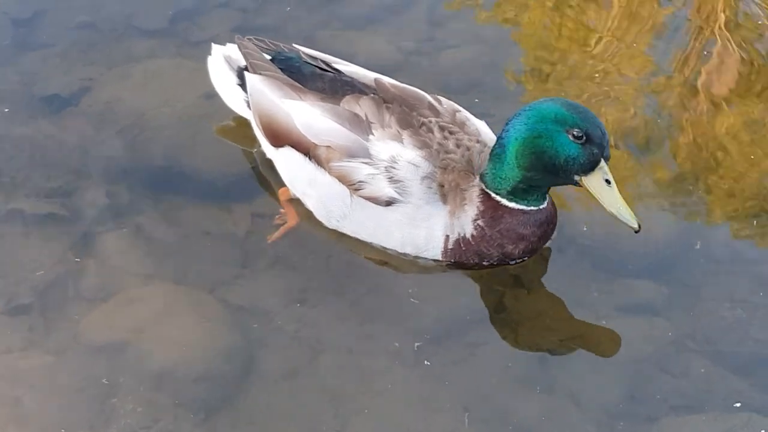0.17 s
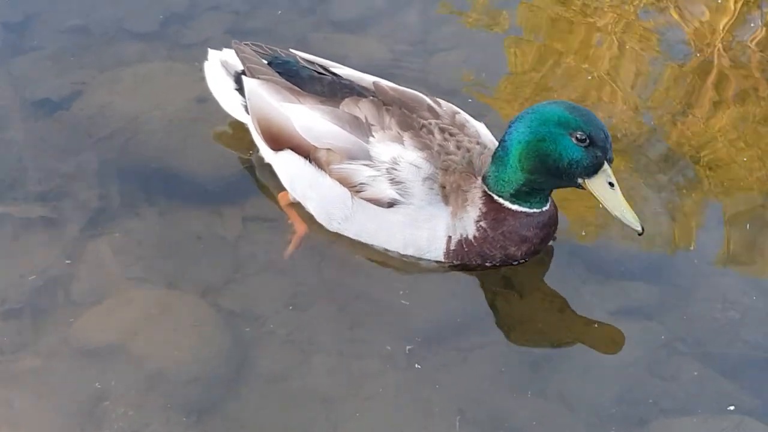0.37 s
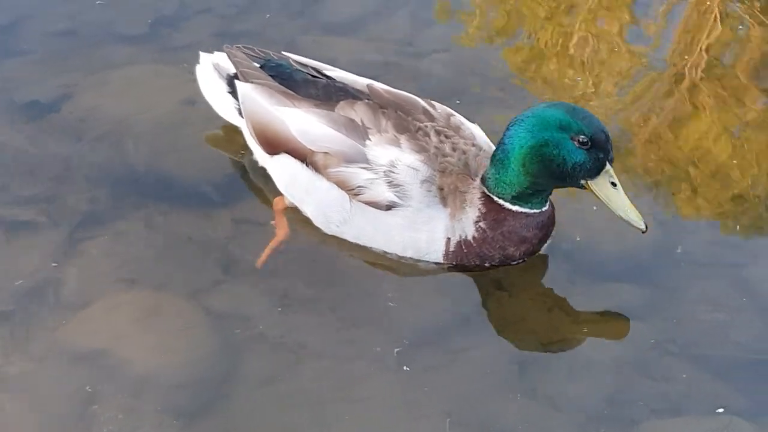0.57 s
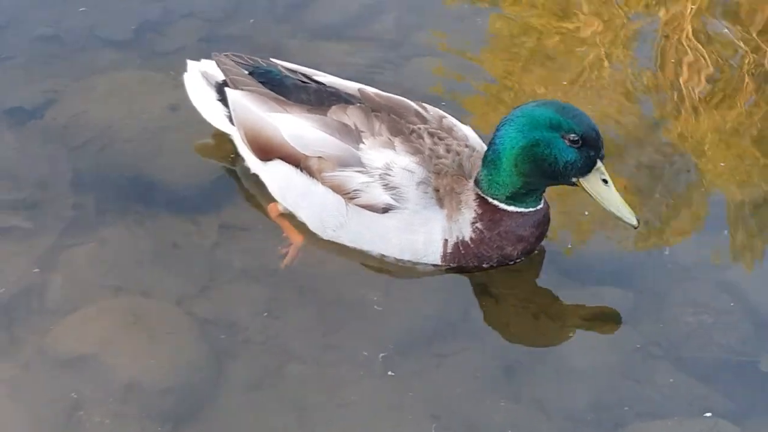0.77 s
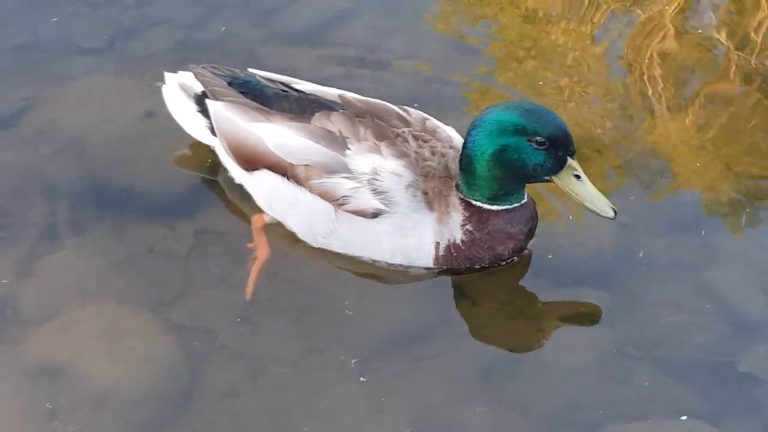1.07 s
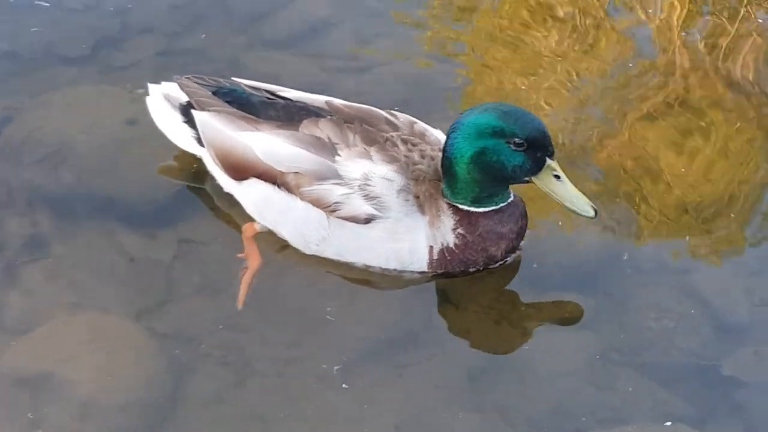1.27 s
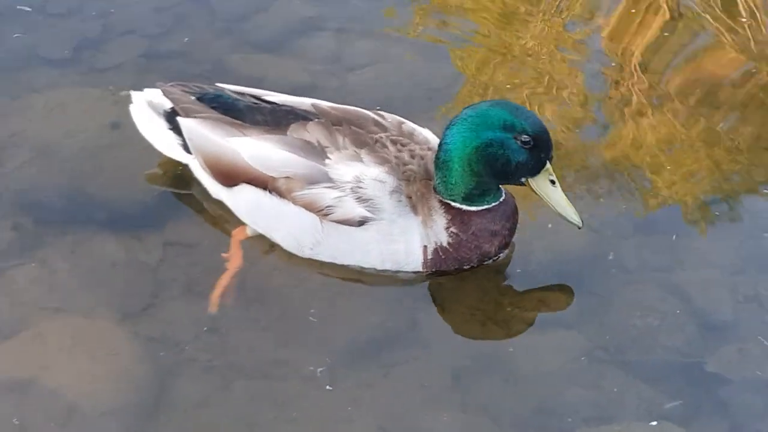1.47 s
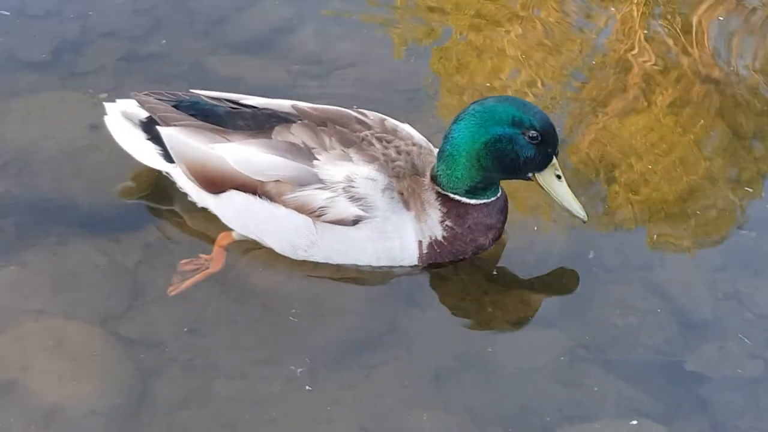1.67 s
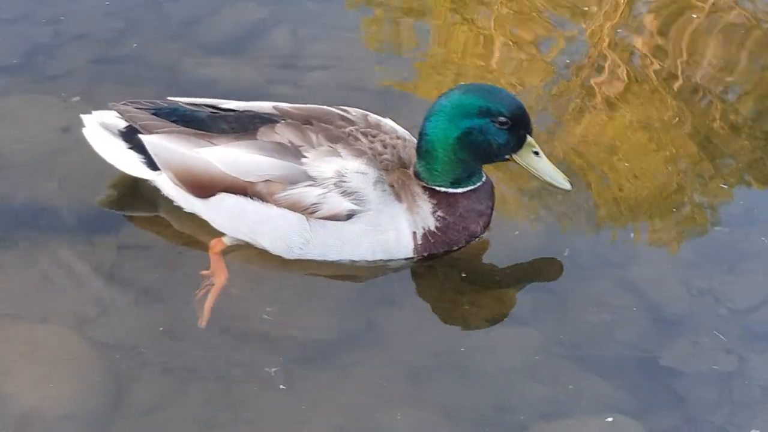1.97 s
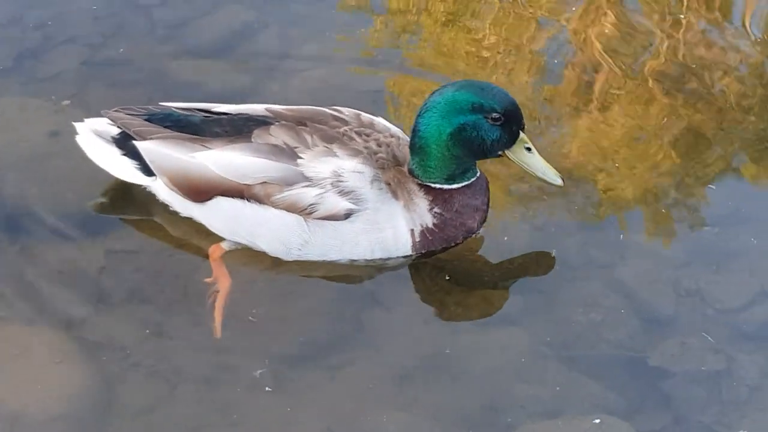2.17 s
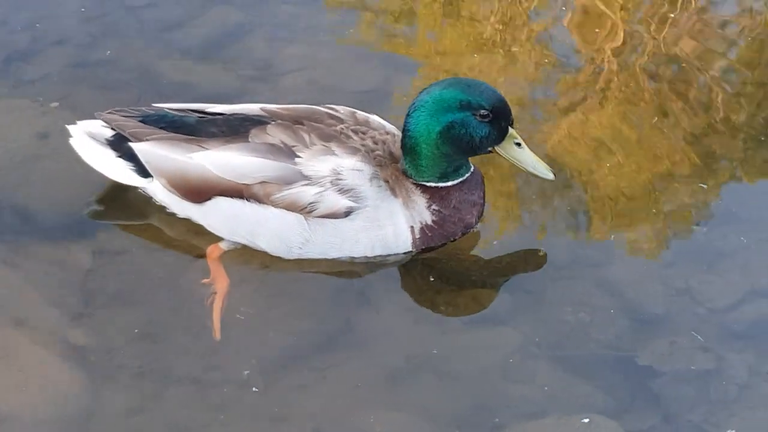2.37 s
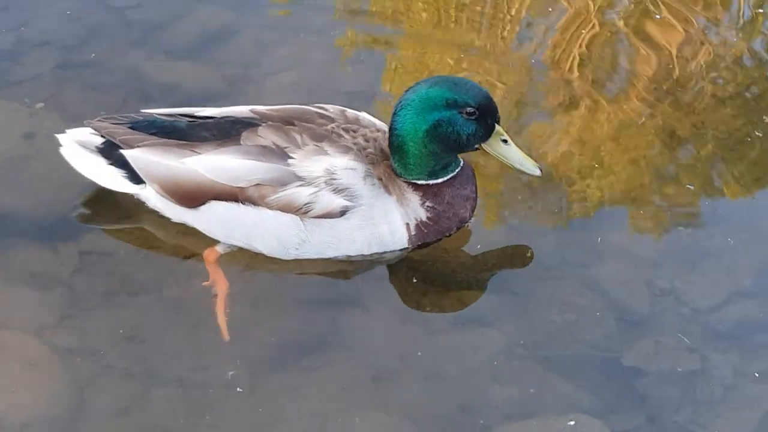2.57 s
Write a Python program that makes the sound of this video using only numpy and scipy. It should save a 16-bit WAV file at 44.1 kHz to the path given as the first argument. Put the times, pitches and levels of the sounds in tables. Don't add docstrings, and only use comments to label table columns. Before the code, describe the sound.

Close stereo outdoor pickup of a drake muttering brief grating quacks, each a rattle of a few quick pulses, with tiny bill ticks, short pond echo, left-side wind thumps, light reed hiss and faint distant traffic.

```python
import sys
import numpy as np
from scipy import signal
from scipy.fft import rfft, irfft, next_fast_len
from scipy.io import wavfile
from scipy.ndimage import uniform_filter1d, map_coordinates

SR = 44100
rng = np.random.default_rng(int(sys.argv[2]) if len(sys.argv) > 2 else 0)


def amplitude_ratio(level_db):
    exponent = np.asarray(level_db, float) / 20
    return 10 ** exponent


def pcm_store(signal):
    levels = np.round(np.clip(np.atleast_2d(signal), -1, 1) * 32767)
    wavfile.write(sys.argv[1], SR, levels.astype(np.int16).T)


N = 119952

# (frequency [Hz], density [dB per Hz])
WASH_SPECTRUM = [(240, -79), (400, -3), (569, -5.5), (914, -13), (1960, -4.5), (2320, -18), (4560, -38),
                 (7670, -33), (15500, -60)]
# (frequency [Hz], level [dB])
TRAFFIC_SPECTRUM = [(60, -17), (130, 3), (300, -5.5), (700, -20.5), (1200, -52)]
# (time [s], level [dB])
BUFFET_LEVEL = [(0.0, -52), (0.25, -59.5), (0.78, -51), (0.89, -52.5), (1.12, -49), (1.3, -48.5),
                (1.85, -53.5), (2.44, -52.5), (2.61, -46), (2.72, -51)]
# (frequency [Hz], density [dB per Hz])
RUMBLE_SPECTRUM = [(12, -32), (20, -5), (108, 1.5), (171, -8.5), (253, -13), (368, -29), (564, -36.5),
                   (664, -50), (1000, -43), (1300, -86), (2200, -120)]
# (frequency [Hz], gain [dB])
RIGHT_PORT_GAIN = [(30, -2.5), (100, -7.5), (200, -1.5), (700, 8)]
# (time [s], peak [dB], swing [Hz], snap [dB])
THUMPS = [(0.504, -42, 118, -16), (0.736, -42, 80, -35), (0.748, -40, 79.6, -31), (0.761, -43.5, 82, -40),
          (1.136, -43, 91, -40), (1.208, -36, 85, -42), (1.2415, -25.5, 106.5, -18), (1.442, -32, 98, -22),
          (1.459, -35, 75.5, -48), (1.486, -35.5, 98, -33), (1.626, -27.5, 84.4, -28),
          (1.721, -39.5, 85, -32), (1.997, -34.5, 157, -44), (2.016, -37.5, 79, -40),
          (2.12, -24, 95.3, -30), (2.187, -42, 78, -19), (2.234, -42, 75.6, -27), (2.367, -30, 99.7, -33),
          (2.443, -42, 65.5, -38), (2.457, -37, 61.9, -43), (2.512, -42, 129, -8), (2.521, -35, 90, -35),
          (2.543, -47.5, 75.4, -5.5), (2.617, -37, 129, -18), (2.568, -44, 110, -19),
          (2.643, -41.5, 108, -18), (2.673, -40, 81, -33), (2.685, -40, 75, -30), (2.701, -39.5, 80, -20)]
SUCTION_THUMPS = [5, 6, 13]
# (frequency [Hz], width [Hz], level [dB])
SNAP_PEAKS = [(300, 380, 0), (900, 900, -27)]
# (time [s], level [dB])
GUST_LEVEL = [(0, -84), (.4, -76), (.74, -78.5), (.84, -63.5), (.96, -67.5), (1.02, -72), (1.25, -69.5),
              (1.5, -66.5), (1.63, -66), (1.72, -73.5), (1.95, -76.5), (2.05, -76.5), (2.22, -77.5),
              (2.3, -62), (2.4, -62.5), (2.5, -66.5), (2.62, -70.5), (2.72, -67)]
# (frequency [Hz], density [dB per Hz])
REED_SPECTRUM = [(530, -18), (900, -14), (1240, -13.5), (1580, -5.5), (2790, -6.5), (3580, -7),
                 (5840, -6.5), (7500, -4), (15500, -24.5)]
# (frequency [Hz], width [Hz], level [dB])
TIP_PEAKS = [(10200, 2800, 0)]
# (frequency [Hz], T60 [s])
POND_DECAY = [(800, 0.27), (2000, 0.17), (8000, 0.24)]
# (time [s], length [s], level [dB])
LEADS = [(0.739, 0.023, -57), (0.904, 0.015, -57), (1.556, 0.026, -61), (1.709, 0.017, -54),
         (1.966, 0.0089, -57.5), (2.097, 0.014, -54.5), (2.651, 0.014, -58), (0.32, 0.0089, -60),
         (.525, 0.017, -60), (1.638, 0.015, -52), (.981, .012, -47.5), (.815, 0.011, -51.5),
         (1.08, 0.011, -55.5)]
# (frequency [Hz], width [Hz], level [dB])
LEAD_PEAKS = [(1075, 310, 1.5), (1630, 380, -1)]
# (time [s], peak [dB])
TICKS = [
    (.207, -54),
    (.42, -54),
    (.738, -52),
    (.906, -50),
    (1.557, -52),
    (1.711, -51),
    (2.1, -57),
    (2.655, -55),
]
# (frequency [Hz], level [dB])
TICK_SPECTRUM = [(300, -20), (600, -6), (1200, -3), (2500, -9), (4000, -12), (9000, -19)]
# (frequency [Hz], width [Hz], level [dB])
SPIT_PEAKS = [(7600, 6200, 0)]
# (first pulse [s], pulse rate [1/s])
BEATS = [(.132, 97), (.222, 106), (.323, 99), (.395, 99), (.462, 104), (.767, 101), (.922, 104), (.992, 97),
         (1.152, 99), (1.260, 94), (1.573, 104), (1.652, 95), (1.732, 101), (1.779, 103), (1.977, 95),
         (2.116, 107), (2.237, 92), (2.331, 89), (2.668, 92)]
# (length [s], level [dB], bill opening [dB])
QUACKS = [(0.098, -52.5, -12), (0.065, -36, -1.5), (0.042, -54.5, -8), (0.06, -43, -8.5),
          (0.0578, -34, -1.5), (0.044, -38, -1.5), (0.059, -32.5, 1.5), (0.08, -37.5, -2),
          (0.0616, -34.5, 0), (0.048, -40.5, -5), (0.061, -35, 1.5), (0.038, -55, 1), (0.041, -38, -1.5),
          (0.076, -36, 1), (0.073, -39, -2.5), (0.064, -35.5, 2), (0.063, -42, -7), (0.0618, -39.5, 0.5),
          (0.07, -41.5, -4)]
# (loudest point [share of length], throat [Hz], palate [Hz], palate [dB], nostril [Hz])
VOICES = [(0.27, 1566, 2500, -20, 5240), (0.54, 1670, 3120, -28.5, 5500), (0.25, 1580, 2200, -11, 6070),
          (0.56, 1620, 2640, -24, 5170), (0.49, 1685, 3160, -29, 5000), (0.37, 1654, 2550, -31, 4800),
          (0.58, 1667, 3160, -29, 5500), (0.33, 1640, 2550, -23.5, 5500), (0.64, 1626, 3100, -36, 5740),
          (0.35, 1576, 2700, -24, 4300), (0.51, 1646, 2820, -25.5, 5950), (0.13, 1500, 2800, -20, 5930),
          (0.24, 1616, 2520, -28, 8700), (0.66, 1660, 2860, -29, 5840), (0.54, 1627, 2670, -25, 6170),
          (0.5, 1697, 2800, -23.5, 6070), (0.45, 1640, 2580, -22, 4900), (0.86, 1690, 1500, -25, 5300),
          (0.12, 1596, 2600, -31, 3900)]
# (frequency [Hz], width [Hz], level [dB])
CHEST_PEAKS = [(1121, 121, -15), (1363, 76, -17)]
# (frequency [Hz], width [Hz], level [dB])
THROAT_PEAKS = [(1635, 270, 0), (1860, 340, -4), (2130, 290, -4)]
# (frequency [Hz], width [Hz], level [dB])
BILL_PEAKS = [(3895, 350, -28.5), (6340, 610, -29.5)]
# (frequency [Hz], width [Hz], level [dB])
PORT_PEAKS = [(7300, 1700, -13)]

WASH_DB, WASH_LEFT_DB, WASH_PATCHY_DB, CAPSULE_DB, TRAFFIC_DB = -68.5, -14.5, 1.2, -75, -61
LUMPS_DB, FLUTTER_DB = 2.5, 1.3
THUMP_CYCLES, THUMP_LAG_S, SNAP_DB, SNAP_T60_S = 1.37, .00168, 25, .016
TIPS_DB, TIPS_GROW = -12, .36
POND_DB, POND_LEFT_DB, LEAK_DB, TOP_HZ = -17, -8, -14.5, 15700
SPIT_S, SPIT_DB = 2.6, -43
PULSES, SLOWS, JITTER_S, SCATTER_DB = 14, .15, .0007, 2
START_DB, END_DB = -7, -9
PUSH_S, PUSH_STRETCH = .00122, .2
PUSH_START, PUSH_SPREAD, PUSH_CLIMBS = .93, .045, .055
SLAP_LAG_S, SLAP_DB, SLAP_SCATTER_DB, SLAP_PITCH = .0036, -5, 4, 1.13
RASP, TRICKLE_DB, BILL_TRICKLE_DB = .22, -11, -6
THROAT_TOP_HZ = 2446
CHEST_LATE_DB, CHEST_PITCH, CHEST_LIFTS_PER_DB = 7, 1.0645, .0084
BILL_GROWS, BILL_SWELLS, BILL_WANDER = 2.56, 1.8, .012
PALATE_WIDTH_HZ, NOSTRIL_WIDTH_HZ, NOSTRIL_DB = 357, 500, -29


def unit(x):
    return x / np.sqrt(np.mean(x ** 2) + 1e-20)


def along(points, hz):
    f, v = np.transpose(points)
    return np.interp(np.log(hz + 1), np.log(f + 1), v)


def curve(rows):
    return np.interp(np.arange(N) / SR, *np.transpose(rows))


def wobble(knots_per_s):
    return map_coordinates(rng.standard_normal(400), [np.arange(N) * knots_per_s / SR])


def filtered(x, response):
    size = next_fast_len(x.shape[-1] + 8192)
    spectrum = rfft(x, size) * response(np.fft.rfftfreq(size, 1 / SR))
    return irfft(spectrum, size)[..., :x.shape[-1]]


def cavity(peaks, shift=1):
    def response(f):
        return sum(amplitude_ratio(db) * (1j * f * width / ((hz * shift) ** 2 - f * f + 1j * f * width)) ** 2
                   for hz, width, db in peaks)
    return response


def rush(spectrum, patchy_db):
    z = signal.stft(rng.standard_normal(N + 4096), nperseg=512)[2]
    patches = uniform_filter1d(rng.standard_normal(z.shape), 6, 0)
    patches = uniform_filter1d(patches, 10, 1)
    x = signal.istft(z * amplitude_ratio(patchy_db * unit(patches)), nperseg=512)[1]
    return unit(filtered(x, lambda hz: amplitude_ratio(along(spectrum, hz)))[2048:][:N])


def wash():
    far = np.array([rush(WASH_SPECTRUM, WASH_PATCHY_DB) for _ in "LR"])
    far = amplitude_ratio(WASH_DB) * amplitude_ratio([[WASH_LEFT_DB], [0]]) * far
    return far + amplitude_ratio(CAPSULE_DB) * rng.standard_normal((2, N))


def traffic():
    return amplitude_ratio(TRAFFIC_DB) * rush(TRAFFIC_SPECTRUM, patchy_db=3.5)


def buffet():
    left, right = (unit(amplitude_ratio(LUMPS_DB * wobble(25.16)) * rush(RUMBLE_SPECTRUM, LUMPS_DB)) for _ in "LR")
    right = filtered(right, lambda hz: amplitude_ratio(along(RIGHT_PORT_GAIN, hz)))
    return np.array([amplitude_ratio(curve(BUFFET_LEVEL) + 6) * left, amplitude_ratio(-47.5) * right])


def thumps():
    out, t = np.zeros(N + SR), np.arange(SR // 10) / SR
    rise = 1 - np.exp(-(t / .0024) ** 2)
    for i, (s, db, hz, snap_db) in enumerate(THUMPS):
        u = t * hz / THUMP_CYCLES * 2.28
        phase = 2 * np.pi * (hz * t + .27 * (1 - np.exp(-t / .0026))) - .6
        swing = rise * np.exp(-(u - .8) ** 2 / 2) * np.sin(phase)
        burst = amplitude_ratio(SNAP_DB + snap_db - 60 * t / SNAP_T60_S) * rng.standard_normal(len(t))
        sign = -1 if i in SUCTION_THUMPS else 1
        hit = sign * amplitude_ratio(db + 5.5) * (swing + filtered(burst, cavity(SNAP_PEAKS)))
        out[round((s + THUMP_LAG_S) * SR):][:len(t)] += hit
    return out[:N]


def reeds():
    gust_db = curve(GUST_LEVEL) + FLUTTER_DB * wobble(11.78)
    tips = unit(filtered(rng.standard_normal(N), cavity(TIP_PEAKS)))
    tips_db = TIPS_DB + TIPS_GROW * (gust_db - gust_db.max())
    return amplitude_ratio(gust_db + 8) * (rush(REED_SPECTRUM, patchy_db=2) + amplitude_ratio(tips_db) * tips)


def pond(x):
    hz, t, z = signal.stft(rng.standard_normal((2, SR // 2)), SR, nperseg=256)
    decay = amplitude_ratio(-60 * t / along(POND_DECAY, hz)[:, None])
    tail = signal.istft(z * decay, SR, nperseg=256)[1]
    delayed = np.pad(x, (300, 0))[None]
    echo = signal.fftconvolve(delayed, tail / np.linalg.norm(tail[0]), axes=1)[:, :N]
    return amplitude_ratio(POND_DB) * amplitude_ratio([[POND_LEFT_DB], [0]]) * echo


def leads():
    t, flow = np.arange(N) / SR, np.zeros(N)
    for s, length, db in LEADS:
        flow += amplitude_ratio(db) * np.interp(t - s, [0, .002, length, length + .0071], [0, 1, .83, .016])
    return filtered(flow * 7.5 * rng.standard_normal(N), cavity(LEAD_PEAKS))


def bill_ticks():
    ticks, spit, t = np.zeros(N + SR), np.zeros(N), np.arange(300) / SR
    for s, db in TICKS:
        ticks[round(s * SR):][:len(t)] = amplitude_ratio(db + 12 - 60 * t / .005) * rng.standard_normal(len(t))
    spit[round(SPIT_S * SR):][:len(t)] = amplitude_ratio(SPIT_DB - 60 * t / .008) * rng.standard_normal(len(t))
    ticks = filtered(ticks[:N], lambda hz: amplitude_ratio(along(TICK_SPECTRUM, hz)))
    return ticks + filtered(spit, cavity(SPIT_PEAKS))


def pushes(t, at, size, hz, luck):
    since = np.clip(t - at[:, None], 0, None)
    u = since / (PUSH_S * np.exp(PUSH_STRETCH * luck[:, :1])) / 2
    gate = size[:, None] * (u * np.exp(1 - u)) ** 4
    pitch = PUSH_START + PUSH_SPREAD * luck[:, 1:] + PUSH_CLIMBS * u
    tone = np.sin(2 * np.pi * hz * since * pitch)
    return gate.sum(0), (gate * tone).sum(0)


def quack(rate, length, open_db, peak_at, throat_hz, palate_hz, palate_db, nostril_hz):
    t, k = np.arange(SR // 5) / SR, np.arange(PULSES)
    luck = rng.standard_normal((PULSES, 7))
    at = np.where(k > 0, k / rate * (1 + SLOWS * k / rate) + JITTER_S * luck[:, 0], 0)
    swell_at = [0, np.clip(peak_at, .05, .9), 1, 1.15]
    effort_db = np.interp(t / length, swell_at, [START_DB, 0, END_DB, -60])
    size = amplitude_ratio(np.interp(at, t, effort_db) + SCATTER_DB * luck[:, 1]) * (at < length)
    push_gate, push_tone = pushes(t, at, size, throat_hz, luck[:, 2:4])

    slap = size * amplitude_ratio(SLAP_DB + SLAP_SCATTER_DB * np.tanh(luck[:, 6])) * np.minimum(k / 3, 1)
    slap_gate, slap_tone = pushes(t, at + SLAP_LAG_S, slap, SLAP_PITCH * throat_hz, luck[:, 4:6])
    gate, tone = push_gate + slap_gate, push_tone + slap_tone

    air, onset = rng.standard_normal(len(t)), 1 - np.exp(-t / .004)
    rasp = (amplitude_ratio(TRICKLE_DB + effort_db) * onset + gate) * air
    hiss = (amplitude_ratio(BILL_TRICKLE_DB + effort_db) * onset + gate) * air

    source = (1 - RASP) * .3 * tone + RASP * rasp
    throat = filtered(source, cavity(THROAT_PEAKS, throat_hz / THROAT_PEAKS[0][0]))
    throat = filtered(throat, lambda hz: 1 / (1 + (hz / THROAT_TOP_HZ) ** 12))

    chest_db = CHEST_LATE_DB * t.clip(0, length) / length - open_db
    chest = filtered(rasp * amplitude_ratio(chest_db), cavity(CHEST_PEAKS, CHEST_PITCH + CHEST_LIFTS_PER_DB * open_db))

    mouth_peaks = [*BILL_PEAKS, (nostril_hz, NOSTRIL_WIDTH_HZ, NOSTRIL_DB)]
    mouth = cavity(mouth_peaks, 1 + BILL_WANDER * luck[0, 0])
    bill = amplitude_ratio(BILL_GROWS * open_db) * filtered(hiss * amplitude_ratio(BILL_SWELLS * effort_db), mouth)
    palate = filtered(hiss * amplitude_ratio(effort_db), cavity([(palate_hz, PALATE_WIDTH_HZ, palate_db)]))

    throat_rms = np.sqrt(np.sum(throat ** 2) / (length * SR))
    return (throat + .53 * chest + .42 * bill + palate) / throat_rms


def drake():
    out = np.zeros(N + SR)
    for (s, rate), (length, db, open_db), voice in zip(BEATS, QUACKS, VOICES):
        out[round(s * SR):][:SR // 5] += amplitude_ratio(db) * quack(rate, length, open_db, *voice)
    return out[:N] + leads() + bill_ticks()


def scene():
    bird = drake()
    near = np.array([thumps(), bird + reeds()])
    return near + pond(bird) + buffet() + wash() + traffic()


def roll_off(x):
    return signal.sosfilt(signal.butter(12, 15650, fs=SR, output="sos"), x)


def record(dry):
    mixed = dry + amplitude_ratio(LEAK_DB) * dry[::-1]
    ring = cavity(PORT_PEAKS)
    mix = filtered(mixed, lambda hz: (1 + ring(hz)) * (hz < TOP_HZ))
    return roll_off(mix)


dry = scene()
out = record(dry)
pcm_store(out)
```